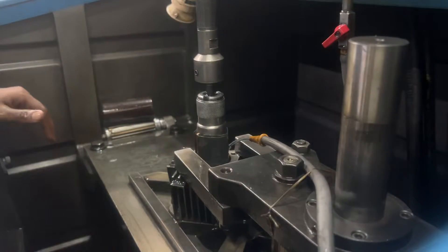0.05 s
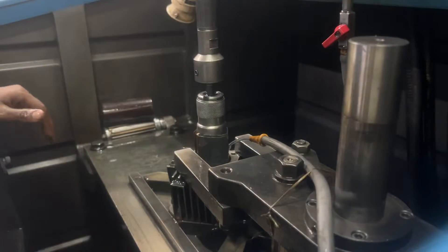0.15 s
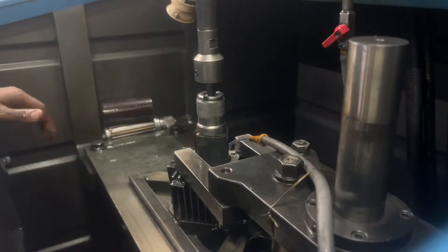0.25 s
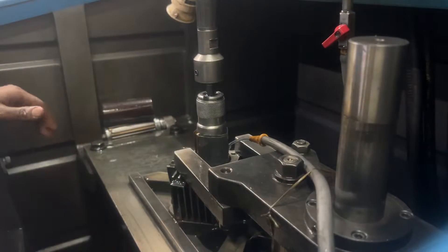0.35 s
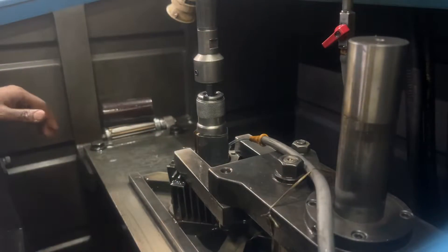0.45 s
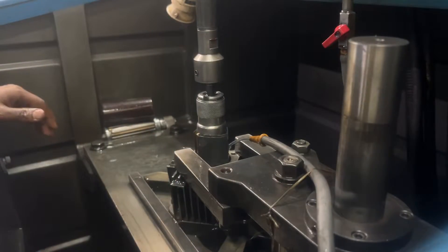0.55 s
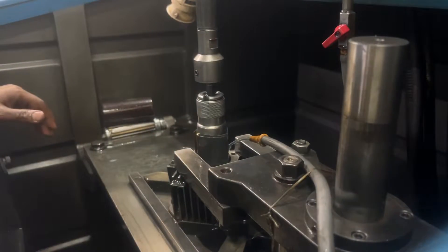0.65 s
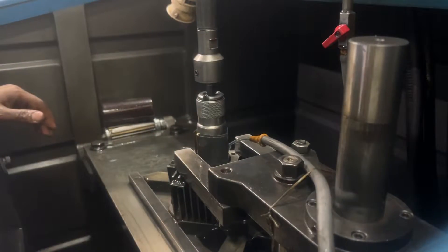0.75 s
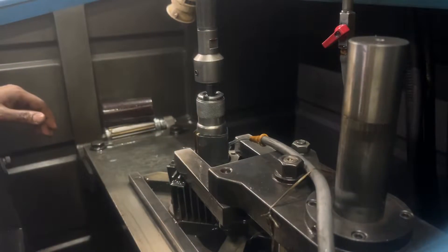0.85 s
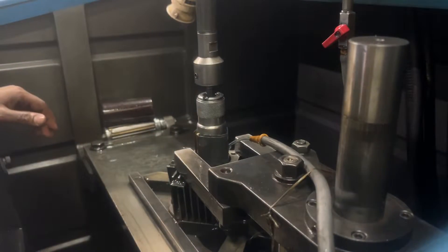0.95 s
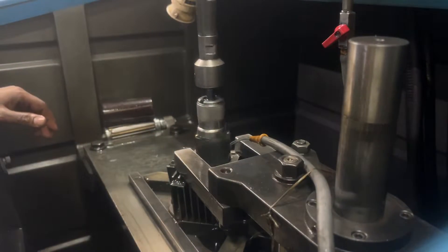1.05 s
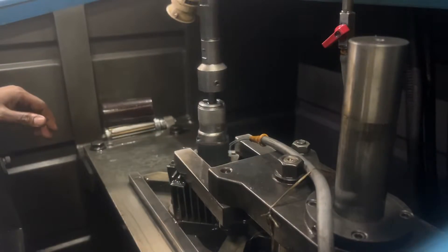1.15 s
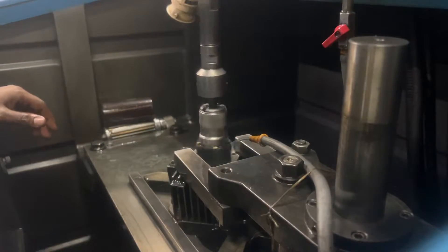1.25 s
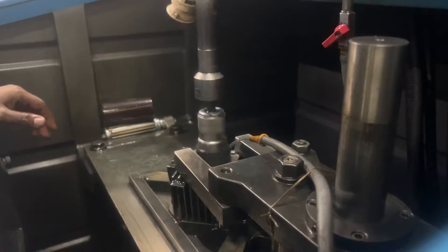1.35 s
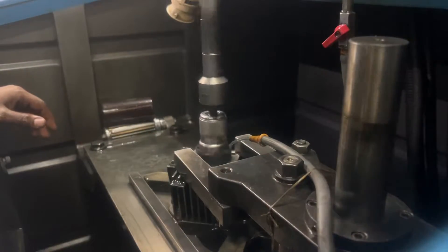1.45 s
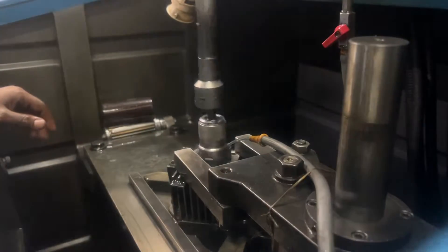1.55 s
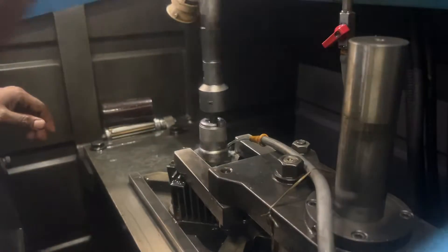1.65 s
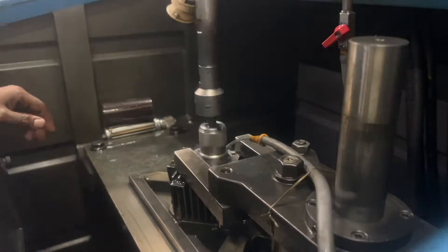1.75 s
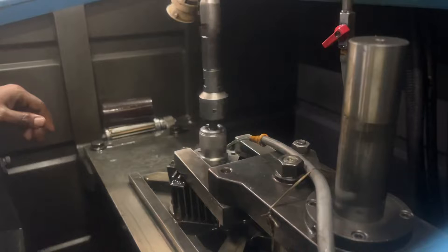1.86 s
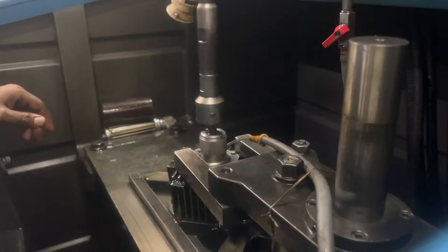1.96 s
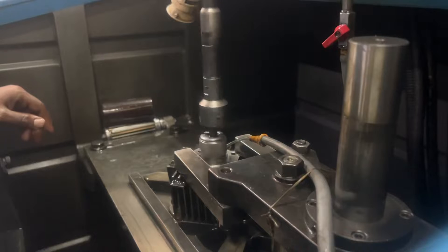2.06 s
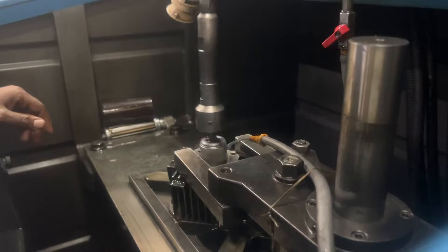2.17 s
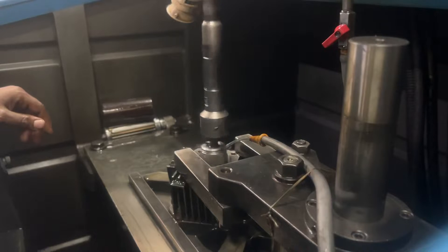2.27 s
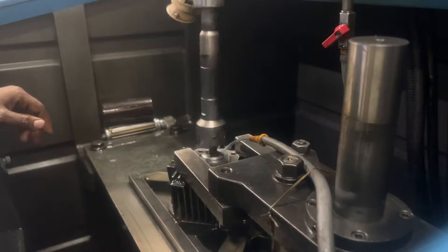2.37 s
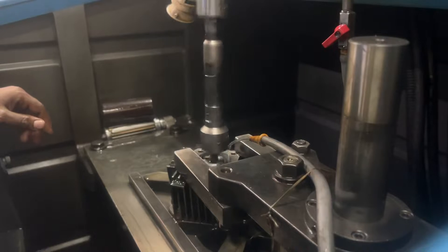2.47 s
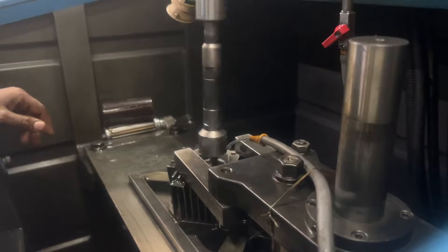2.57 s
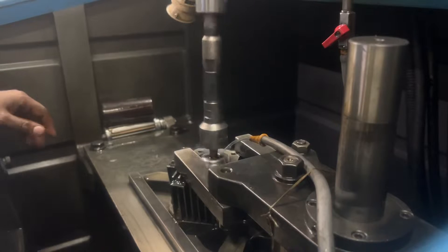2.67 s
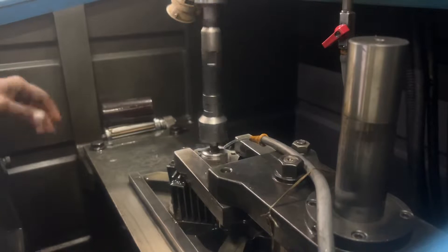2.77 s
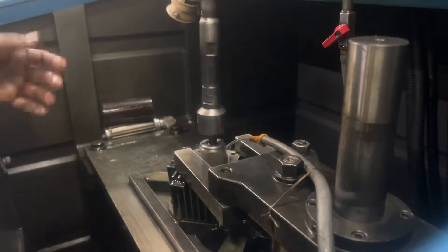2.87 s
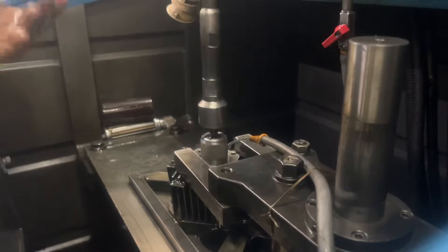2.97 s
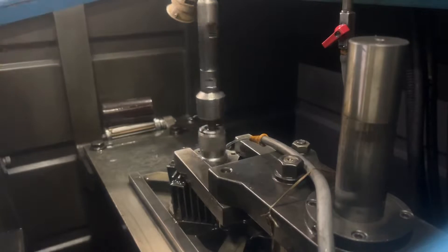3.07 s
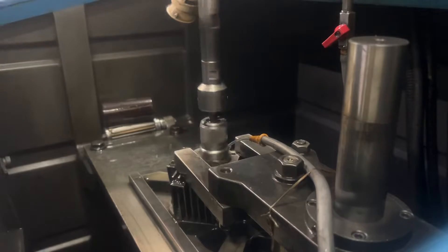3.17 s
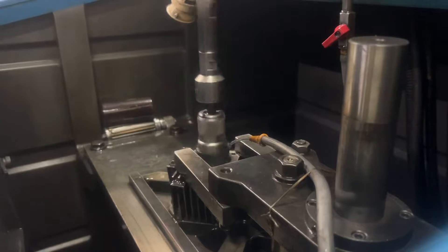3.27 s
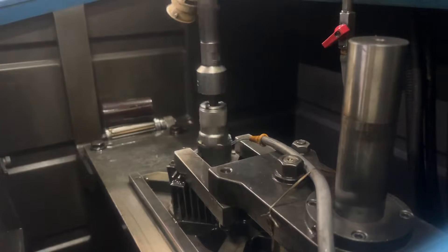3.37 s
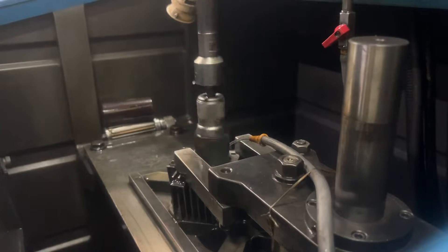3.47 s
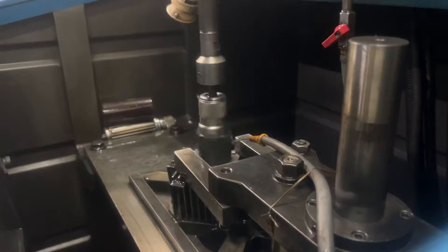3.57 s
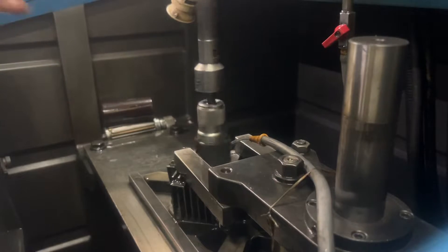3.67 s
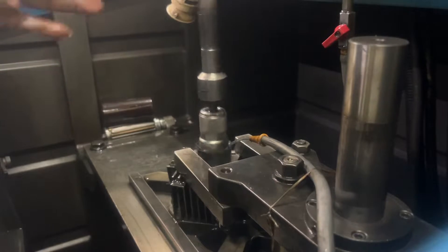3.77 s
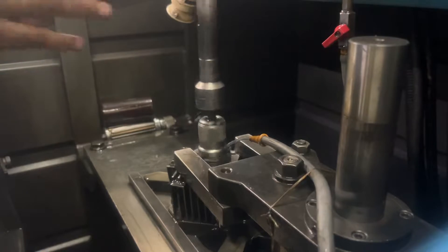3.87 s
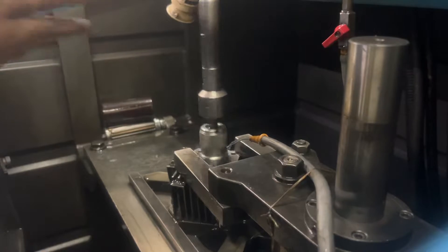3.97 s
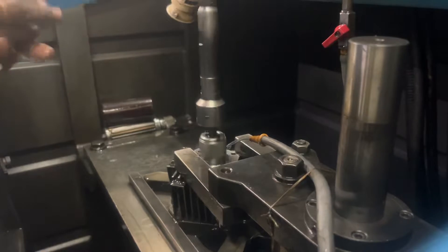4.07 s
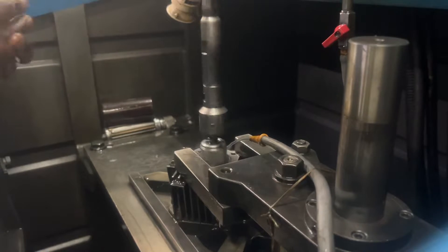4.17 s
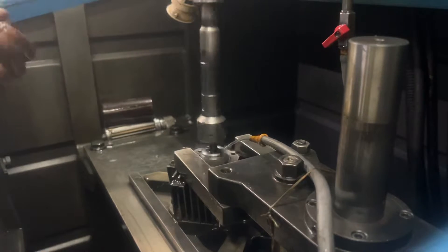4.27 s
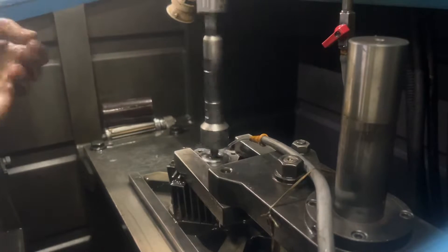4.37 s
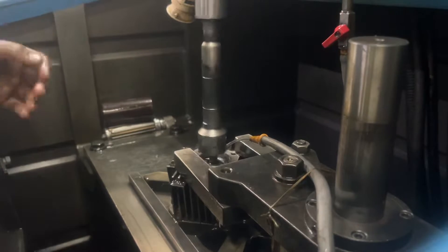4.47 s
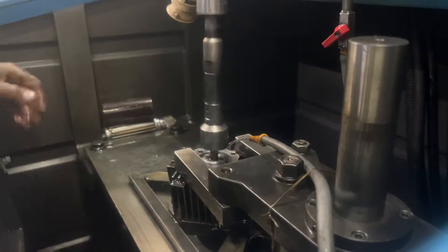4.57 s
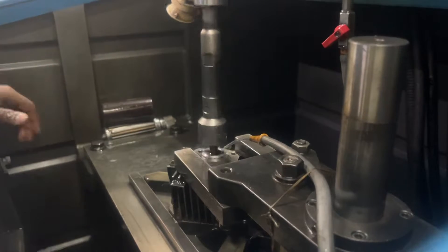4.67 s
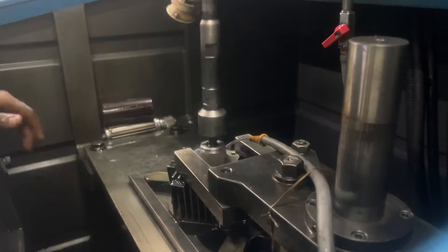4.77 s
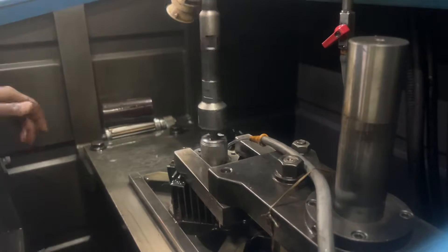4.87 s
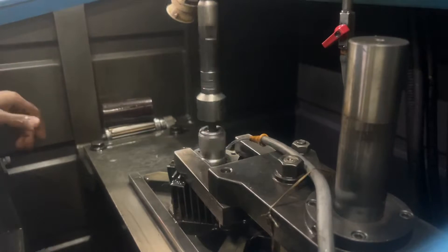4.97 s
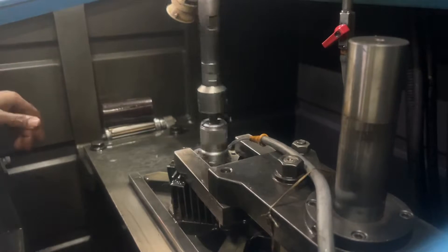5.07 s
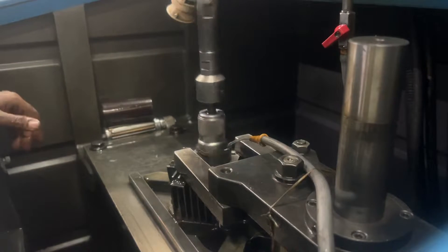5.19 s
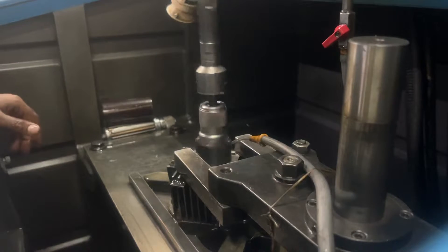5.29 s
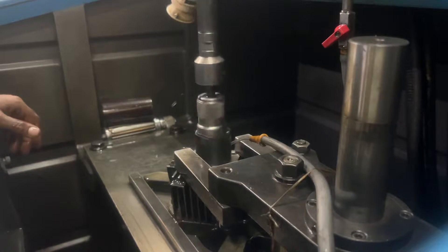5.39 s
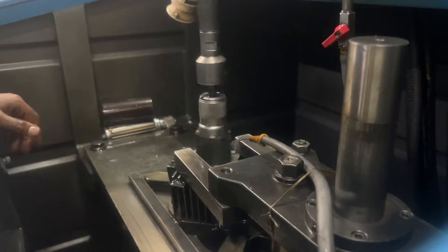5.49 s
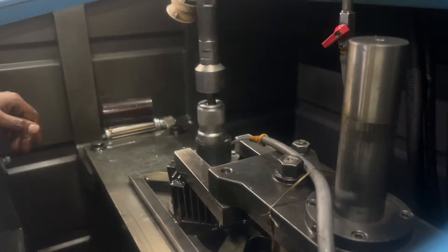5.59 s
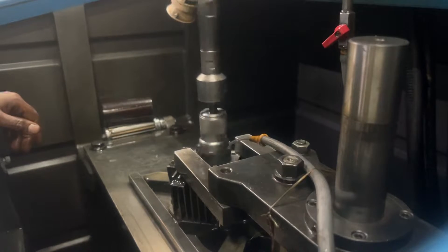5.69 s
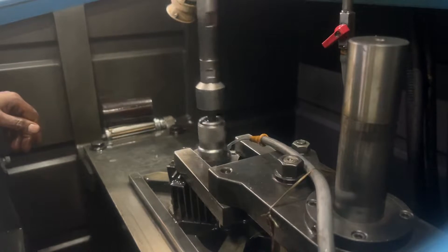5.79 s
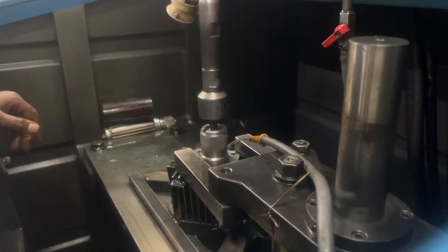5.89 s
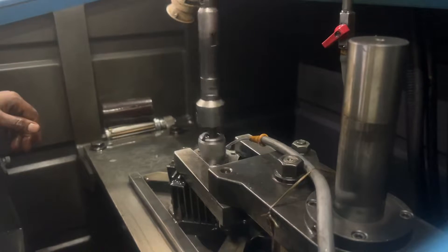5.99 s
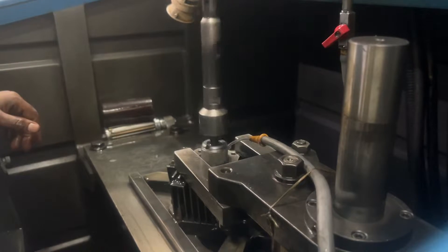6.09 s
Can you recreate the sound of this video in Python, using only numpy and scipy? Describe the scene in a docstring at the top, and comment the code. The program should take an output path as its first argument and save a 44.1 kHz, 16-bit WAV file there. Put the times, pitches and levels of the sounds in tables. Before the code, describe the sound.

A constant pump drone with fine overtones fills a metal enclosure. First only hum, hiss and faint whistling; then the ram sets off with a clunk, and the cabinet drone thickens. Reversals follow roughly every second, some as double knocks with low booms and rattling panels, plus short spurts of oil. The close two-channel microphone hears wide, dry hiss and solid central bass. The hum never stops.

```python
"""A gear pump hums on its tooth rate in the steel cabinet of a hydraulic test bench: steady sines with overtones.
A ram then strokes up and down. Each reversal is a valve clunk, made of noise broken into small knocks.
The floor answers with low sine booms and a rumble; the cabinet and panels ring as noise through resonances.
Oil spurts and hisses as coloured noise, and whistles through the valves as wavering sines.
A two-port microphone close by hears the bass nearly alike on both sides and the treble with a lag."""
import sys
import numpy as np
from scipy import signal
from scipy.fft import rfft, irfft, next_fast_len
from scipy.io import wavfile
from scipy.ndimage import uniform_filter1d

SR = 44100
rng = np.random.default_rng(int(sys.argv[2]) if len(sys.argv) > 2 else 0)


def to_wav(sig):
    """Store sig (one row per channel, or 1-D mono) as 16-bit WAV at the path in sys.argv[1].

    Samples outside -1..1 are clipped; the rate is SR.
    """
    pcm = np.clip(np.atleast_2d(sig), -1, 1) * 32767
    pcm = np.round(pcm).astype(np.int16)
    wavfile.write(sys.argv[1], SR, pcm.T)  # frames by channels


N = 270774  # length in samples
FFT = next_fast_len(N)
T = np.arange(N) / SR  # time in seconds
HZ = np.maximum(np.arange(FFT // 2 + 1) * SR / FFT, 1)  # frequency of each spectrum bin

# Pump: the tooth tone, and its throb once a shaft turn (the depth reached by a 2000 Hz tone)
TOOTH_HZ, TOOTH_DRIFT_HZ = 291.1, 0.12
TOOTH_DB, TOOTH_WAVER_DB = -20, 0.33
TEETH, SHAFT_THROB_DB = 12, 2.0
# pump overtones at rest and under load: (multiple of the tooth rate, level against the tooth tone [dB])
PUMP_REST = [(1, 0), (2, -23), (3, -26), (4, -46), (5, -39.5), (6, -54), (7, -44), (8, -35), (9, -33.5),
             (10, -53), (11, -40), (12, -42), (13, -39.5), (14, -42)]
PUMP_LOAD = [(1, 0), (2, -36.5), (3, -25), (4, -41.5), (5, -39), (6, -46), (7, -40), (8, -41), (9, -38.5),
             (10, -43.5), (11, -43), (12, -39.5), (13, -51), (14, -42)]
# other steady tones of motor and pipes: (frequency [Hz], level at rest [dB], level under load [dB])
STEADY_TONES = [(246.5, -34.5, -34), (307.9, -36, -34.5), (531.5, -44.5, -59.5), (399, -71, -51),
                (687, -75, -48.5), (3224, -61.5, -60), (6440, -67, -67.5), (7400, -75, -67),
                (8100, -75, -71), (8530, -67, -74), (9100, -60.5, -76), (9281, -60, -84)]

# The ram sets off and takes its load over this time
RAM_STARTS_S, RAM_LOADS_S = 0.87, 0.12

# valve clunks as the ram reverses:
# (time [s], level [dB], rise [s], fall by 60 dB [s], brightness [dB per octave], treble limit [Hz])
CLUNKS = [(0.866, -28.5, 0.021, 0.5, -1.5, 14000), (2.5, -24, 0.04, 0.31, -2.5, 8960),
          (2.6, -23, 0.023, .6, -4.5, 2190), (3.494, -28, 0.034, 0.34, -2, 14000),
          (4.445, -22, 0.029, 0.47, -3.5, 14200), (4.555, -28, 0.011, 0.86, -3, 2197),
          (5.42, -30, 0.029, 0.45, -1.5, 14000)]
# basic colour of every clunk: (frequency [Hz], relative level [dB])
CLUNK_COLOUR = [(150, -6.5), (300, 13), (600, -9), (1200, 0), (2000, 0.5), (3500, -6), (5500, -4.5),
                (7000, -6.5), (9000, -3.5), (12000, -3), (16000, -21)]
# resonances of the valve block: (frequency [Hz], width [Hz], relative strength [dB])
VALVE_BLOCK = [(1310, 100, -20), (1640, 60, 0), (2040, 230, -5), (2660, 60, -11), (3350, 140, 4.5)]
# the longer a clunk rings, the more it breaks into separate knocks
RATTLING_DB_PER_S = 3

# the floor booms and bounces after each reversal:
# (time [s], level [dB], frequency [Hz], rise [s], fall by 60 dB [s])
BOOMS = [(.9, -27, 65.8, 0.18, 1.3), (2.51, -27, 70.8, 0.051, .6), (2.62, -15, 71.7, 0.086, 0.49),
         (2.79, -23, 69.2, .06, .7), (3.51, -21.5, 71.2, 0.075, 0.44), (3.66, -23.5, 71.8, 0.082, 0.41),
         (4.46, -21.5, 59.7, 0.045, 1.1), (4.571, -16, 66.5, 0.061, 0.66), (4.74, -27, 66.1, .06, .7),
         (5.43, -21.5, 70, 0.048, 0.54), (5.6, -29, 69, 0.073, 0.76)]
# The floor's resonance, and a second, looser one under it (level against the first)
FLOOR_HZ, FLOOR_WIDTH_HZ = 69, 16
LOOSE_HZ, LOOSE_WIDTH_HZ, LOOSE_DB = 50, 5.4, -0.88
# The floor rings on after the booms, this far below each one
LINGER_DB, LINGER_T60_S = -14.5, 2.3
RUMBLE_REST_DB, RUMBLE_LOAD_DB = -55, -47

# ways the cabinet rings: (frequency [Hz], width [Hz], relative level under load [dB], change at rest [dB])
DRONE_MODES = [(132, 34, -4.5, -14.5), (159.1, 12.4, 1.5, -1), (175, 34, -14, -4)]
# level of the cabinet drone: (time [s], level [dB])
DRONE_LEVEL = [(0.0, -33), (0.05, -40), (0.53, -31.5), (0.82, -38.5), (0.89, -28), (1.45, -34),
               (1.55, -23.5), (2.03, -33), (2.89, -27), (2.91, -35), (3.04, -26), (3.38, -33.5),
               (3.69, -26.5), (3.85, -31.5), (4.72, -29.5), (4.8, -32), (6.09, -30), (6.14, -33)]
DRONE_WAVER_DB = 2
# panels rattle after each reversal: (time [s], level [dB], rise [s], fall by 60 dB [s])
SHAKES = [(.87, -25.5, 0.13, 1.1), (2.51, -20, 0.025, 0.88), (2.6, -23.5, 0.066, 2.1),
          (3.48, -24.5, 0.032, 1.25), (4.44, -19, 0.034, 0.94), (4.55, -24, .05, 2.4),
          (5.42, -27, 0.046, 1), (5.53, -24, 0.041, 0.59)]
# colour of the panel rattle: (frequency [Hz], relative level [dB])
RATTLE_COLOUR = [(90, -4), (200, 7.5), (330, 7.5), (400, 2.5), (520, 0), (650, -10.5), (800, -9),
                 (1000, -12), (1500, -43.5)]
RATTLE_REST_DB, RATTLE_LOAD_DB, RATTLE_FLICKER_DB = -42, -35.5, 2

# short spurts of oil: (time [s], centre [Hz], width [Hz], level [dB], rise [s], fall by 60 dB [s])
SPURTS = [(.96, 2510, 1500, -35, 0.0049, 0.17), (1.1, 4480, 1200, -47, 0.047, 1.0),
          (1.7, 5500, 2000, -40, 0.0075, 0.16), (2.62, 8300, 2200, -34.5, 0.01, .2),
          (4.055, 5070, 1510, -41.5, 0.0074, .15), (4.559, 8450, 2180, -33, 0.0073, 0.21),
          (5.77, 8400, 2960, -43.5, 0.016, .15), (5.94, 4400, 2000, -43.5, 0.026, 0.68)]
# oil whistling in valve gaps: (start [s], end [s], from [Hz], to [Hz], width of waver [Hz], level [dB])
WHISTLES = [(0, 0.446, 2580, 2560, 39.6, -52), (0.215, .6, 2260, 2290, 27, -50),
            (0.213, 0.552, 3430, 3380, 56.2, -51), (.65, .8, 3520, 3500, 46, -55),
            (1.02, 1.268, 8000, 8040, 50, -50), (1.297, 1.417, 1880, 1920, 40, -50),
            (1.425, 1.604, 3180, 3200, 32, -47.5), (1.584, 1.73, 2130, 2150, 38, -52),
            (2.148, 2.36, 2360, 2440, 37, -53), (2.648, 3.0, 3370, 3386, 53, -51.5),
            (3.052, 3.5, 3330, 3720, 38, -52), (3.2, 3.45, 2540, 2640, 36, -57),
            (3.58, 3.753, 2060, 2070, 37.96, -50), (3.95, 4.455, 1970, 2150, 30.1, -50.5),
            (5.716, 5.901, 3370, 3500, 39, -47.5), (5.92, 6.14, 2100, 2100, 65, -54)]

# motor and fan noise before the pipes colour it: (frequency [Hz], level [dB per Hz])
MOTOR = [(30, -56), (50, -82), (110, -65.5), (250, -59.5), (700, -71), (1000, -72.5), (1800, -83.5),
         (2400, -79.5), (3000, -86), (3400, -81), (4200, -92), (5200, -104), (7000, -86), (8500, -86),
         (11000, -91.5), (13000, -90), (16000, -97)]
# oil flow before the pipes colour it and the surges move it: (frequency [Hz], level [dB per Hz])
FLOW = [(600, -60), (1000, -77.5), (1800, -79), (2200, -83.5), (2900, -87.5), (3300, -83), (4500, -81),
        (7000, -86.5), (8500, -77.5), (10500, -86.5), (11400, -80), (12100, -87.5), (16000, -89)]
# oil flow surges as the ram sets off, then settles: (time [s], change [dB])
OIL_SURGES = [(0, 1), (.1, -9), (.86, -5), (1.0, -2.5), (1.17, 4), (1.4, 1), (2.7, 1), (4.4, -0.4),
              (4.7, -2), (5.95, -1.1), (6.14, -0.5)]
# pipe resonances: (frequency [Hz], width [Hz], relative strength [dB])
PIPES = [(1380, 250, -5.5), (2190, 230, -1.5), (2656, 100, -0.5), (3200, 310, 2.5), (3820, 116, 1),
         (4590, 690, -4.5)]

# between the microphone ports: (frequency [Hz], likeness [0-1], left minus right [dB])
PORTS = [(60, 1, 3), (199, 0.94, 1), (298, 0.95, 0.9), (390, 0.96, -1), (606, 0.29, -1), (1020, 0, 3),
         (2070, 0.2, 0), (2640, 0.25, 3), (3800, 0.3, 4), (5000, 0.37, 7.5), (6000, 0.56, 10),
         (6600, 0.1, 3), (7200, .45, -1), (7800, 0.7, 5), (9000, 1, -1.5), (16000, 1, 2)]
# how far the right side leads: (frequency [Hz], lead [turns])
PORT_LEAD = [(450, 0), (900, -.3), (1200, .12), (2000, .08), (2400, -.3), (3000, -.14), (4000, -.07),
             (7200, -.2), (8600, 0), (10150, .5), (12000, 1), (13750, 1.5), (15550, 2)]
BOTTOM_HZ, TOP_HZ = 46.3, 15750  # limits of what is heard


def undb(db):
    """Turn a level in dB into a gain, where 20 dB is ten times the amplitude."""
    return 10 ** (np.asarray(db) / 20)


def level(x, db):
    """Scale a sound so that its average (rms) strength is the given level."""
    return x * undb(db) / np.sqrt(np.mean(x ** 2))


def walk(rate):
    """Wander at random: values held 1 / rate seconds, smoothed twice, with a spread near 1."""
    hold = int(SR / rate)
    steps = np.repeat(rng.standard_normal(N // hold + 1), hold)
    smooth = uniform_filter1d(uniform_filter1d(steps, hold), hold)
    return 1.335 * smooth[:N]


def shape(table):
    """Gain over frequency, drawn through (frequency [Hz], level [dB]) points."""
    hz, db = np.transpose(table)
    return undb(np.interp(np.log(HZ), np.log(hz), db))


def resonance(hz, width):
    """Gain over frequency of a steep resonance, which favours a narrow band."""
    return 1 / (1 + (2 * (HZ - hz) / width) ** 2)


def noise(gain):
    """Two unrelated noises of the same colour, made from random spectra."""
    real, imaginary = rng.standard_normal((2, 2, len(HZ)))
    spectra = (real + 1j * imaginary) * gain * np.sqrt(FFT / 2)
    return irfft(spectra, FFT)[:, :N]


def burst(start, rise, t60):
    """A smooth swell, then an exponential fall that drops 60 dB in t60 seconds."""
    age = T - start
    swelling = np.sin(np.pi / 2 * np.clip(age / rise, 0, 1)) ** 2
    falling = undb(-60 * np.clip(age - rise, 0, None) / t60)
    return swelling * falling


def swell(envelopes, steady_db):
    """Add envelopes to a steady level by their power, as unrelated sounds add."""
    return np.sqrt(undb(steady_db) ** 2 + sum(e ** 2 for e in envelopes))


def pump_hum(load):
    """Meshing teeth give a tone, overtones and side tones; higher ones waver more and throb once a shaft turn."""
    turns = np.cumsum(TOOTH_HZ + TOOTH_DRIFT_HZ * walk(3)) / SR
    throb_db = SHAFT_THROB_DB * np.sin(2 * np.pi * turns / TEETH)
    tooth_db = TOOTH_DB + TOOTH_WAVER_DB * (walk(9) + walk(15))
    hum = undb(tooth_db) * np.sin(2 * np.pi * turns)

    rest, work = dict(PUMP_REST), dict(PUMP_LOAD)
    overtones = [(k * TOOTH_HZ, TOOTH_DB + rest[k], TOOTH_DB + work[k]) for k in rest if k > 1]
    for hz, rest_db, load_db in overtones + STEADY_TONES:
        unrest = min(hz / 2000, 1.5)
        db = rest_db + load * (load_db - rest_db)
        db = db + (1 + unrest) * walk(6) + unrest * throb_db
        # every tone follows the drift of the tooth rate
        tone_turns = hz / TOOTH_HZ * turns + rng.random()
        hum = hum + undb(db) * np.sin(2 * np.pi * tone_turns)
    return np.sqrt(2) * hum  # levels are rms


def valve_clunks():
    """Each clunk is a crush of small knocks that ring the valve block; a soft blow lacks treble."""
    out = 0
    ring = 1 + 0.99 * sum(undb(db) * resonance(hz, width) for hz, width, db in VALVE_BLOCK)
    for start, db, rise, t60, tilt_db, top_hz in CLUNKS:
        tilt = undb(tilt_db * np.log2(HZ / 1500))
        treble_cut = 1 / np.sqrt(1 + (HZ / top_hz) ** 4)
        crush = level(noise(shape(CLUNK_COLOUR) * ring * tilt * treble_cut), db)
        knocks_db = 1.8 * walk(150) + RATTLING_DB_PER_S * t60 * walk(35)
        out = out + burst(start, rise, t60) * undb(knocks_db) * crush
    return out


def floor_rumble(load):
    """Each boom is a wavering low tone; the floor and a looser resonance under it rumble on afterwards."""
    waver_turns = np.cumsum(2.0 * walk(12)) / SR
    booms, tails = 0, []
    for start, db, hz, rise, t60 in BOOMS:
        tone = np.sin(2 * np.pi * (hz * (T - start) + waver_turns))
        booms = booms + undb(db) * burst(start, rise, t60) * tone
        tails.append(undb(db + LINGER_DB) * burst(start, rise, LINGER_T60_S))

    steady_db = RUMBLE_REST_DB + load * (RUMBLE_LOAD_DB - RUMBLE_REST_DB)
    lingering = swell(tails, steady_db)
    firm = level(noise(resonance(FLOOR_HZ, FLOOR_WIDTH_HZ)), 0)
    loose = level(noise(resonance(LOOSE_HZ, LOOSE_WIDTH_HZ)), LOOSE_DB)
    return np.sqrt(2) * booms + lingering * (firm + loose)


def cabinet_drone(load):
    """The steel cabinet rings at a few low resonances, here noise passed through each of them."""
    drone = 0
    for hz, width, db, rest_db in DRONE_MODES:
        mode_db = db + (1 - load) * rest_db
        drone = drone + undb(mode_db) * noise(resonance(hz, width))
    # soften the chance swells of narrow noise, so that DRONE_LEVEL sets the loudness
    recent_power = uniform_filter1d(drone[0] ** 2, int(0.026 * SR))
    drone = drone / (recent_power + 1e-18) ** 0.13
    drone_db = np.interp(T, *np.transpose(DRONE_LEVEL)) + DRONE_WAVER_DB * walk(7)
    return undb(drone_db) * level(drone, 0)


def panel_rattle(load):
    """Panels shaken by the ram give flickering noise that swells at each reversal and dies away."""
    shakes = [undb(db) * burst(start, rise, t60) for start, db, rise, t60 in SHAKES]
    steady_db = RATTLE_REST_DB + load * (RATTLE_LOAD_DB - RATTLE_REST_DB)
    flicker = undb(RATTLE_FLICKER_DB * walk(17))
    return swell(shakes, steady_db) * flicker * level(noise(shape(RATTLE_COLOUR)), 0)


def oil_spurts():
    """Short spurts of oil are bursts of broad hiss around one frequency."""
    out = 0
    for start, hz, width, db, rise, t60 in SPURTS:
        out = out + burst(start, rise, t60) * level(noise(resonance(hz, width)), db)
    return out


def valve_whistles():
    """Oil in a narrow valve gap whistles: a gliding tone whose pitch and strength waver fast."""
    out = 0
    for start, end, from_hz, to_hz, width, db in WHISTLES:
        hz = np.interp(T, [start, end], [from_hz, to_hz]) + 0.65 * width * walk(3 * width)
        fade = np.clip(np.minimum(T - start, end - T) / 0.028, 0, 1)
        # the two signals are a quarter turn apart
        turns = np.cumsum(hz) / SR + np.array([[0], [0.25]])
        out = out + fade * undb(db + 2.7 * walk(80)) * np.sqrt(2) * np.sin(2 * np.pi * turns)
    return out


def motor_and_oil_hiss():
    """Motor noise under the oil flow, both ringing the pipes; low and high flow flicker apart."""
    per_hz = np.sqrt(SR / 2)  # turns levels per Hz into noise gain
    pipes = 0.69 + 0.53 * sum(undb(db) * resonance(hz, width) for hz, width, db in PIPES)
    low = 1 / (1 + (HZ / 5500) ** 4)  # share of the power that counts as low
    flow = 0
    for share in (low, 1 - low):
        flicker = undb(1.0 * walk(7.9))
        flow = flow + flicker * noise(per_hz * shape(FLOW) * pipes * np.sqrt(share))
    surge = undb(np.interp(T, *np.transpose(OIL_SURGES)))
    return noise(per_hz * shape(MOTOR) * pipes) + surge * flow


def ports(shared, apart, tones):
    """The right port hears the tones and part of the left's noise, turned in phase, plus noise of its own."""
    hz, like, pan_db = np.transpose(PORTS)
    like = np.clip(np.interp(HZ, hz, like), 0, 1)
    pan_db = np.interp(HZ, hz, pan_db)
    lead = np.exp(2j * np.pi * np.interp(HZ, *np.transpose(PORT_LEAD)))
    shared, apart, tones = rfft([shared, apart, tones], FFT)
    left = shared + tones
    right = lead * (like * shared + tones) + np.sqrt(1 - like ** 2) * apart
    return irfft(np.array([left * undb(pan_db / 2), right * undb(-pan_db / 2)]), FFT)[:, :N]


def scene():
    """Add the pump, clunks, floor, cabinet, panels, oil and motor at the two ports."""
    load = np.clip((T - RAM_STARTS_S) / RAM_LOADS_S, 0, 1)  # 0 at rest, 1 under load
    tones = pump_hum(load)
    noises = valve_clunks() + floor_rumble(load)
    noises = noises + cabinet_drone(load) + panel_rattle(load)
    noises = noises + oil_spurts() + valve_whistles() + motor_and_oil_hiss()
    shared, apart = noises
    return ports(shared, apart, tones)


def record(dry):
    """The microphone drops the deepest bass and the recorder cuts the top."""
    bass_cut = signal.butter(3, BOTTOM_HZ, "high", fs=SR, output="sos")
    top_cut = signal.ellip(10, 0.2, 80, TOP_HZ, fs=SR, output="sos")
    return signal.sosfilt(top_cut, signal.sosfilt(bass_cut, dry))


dry = scene()
out = record(dry)
to_wav(out)
```